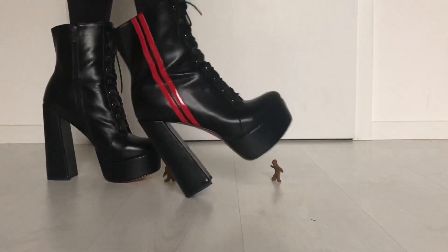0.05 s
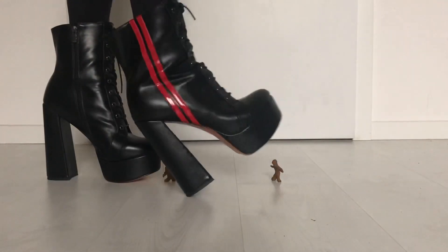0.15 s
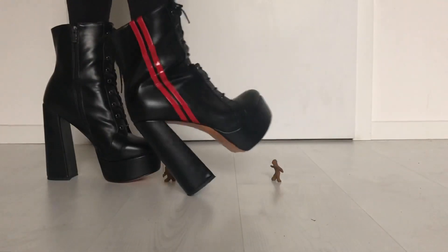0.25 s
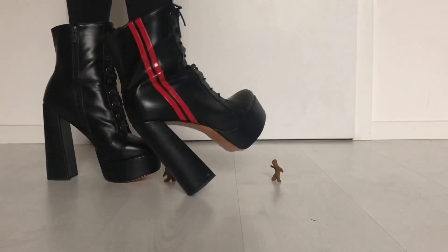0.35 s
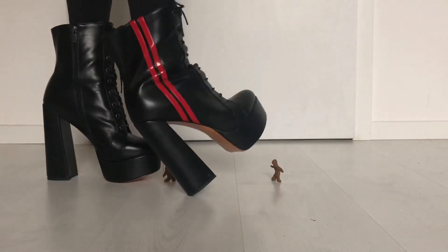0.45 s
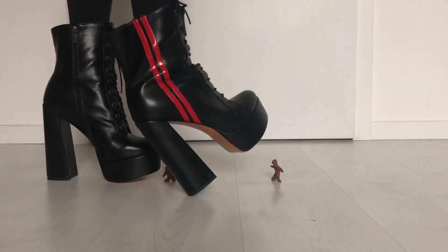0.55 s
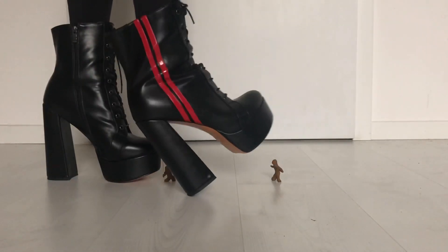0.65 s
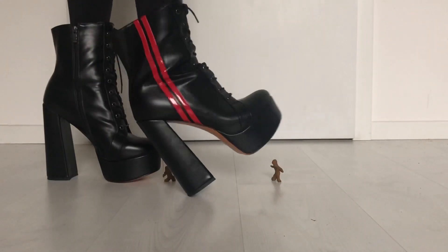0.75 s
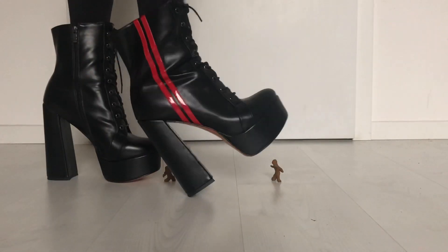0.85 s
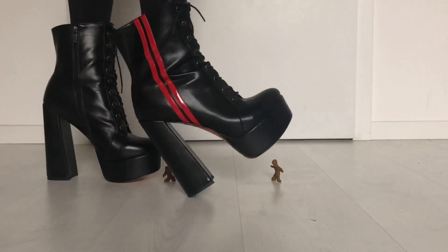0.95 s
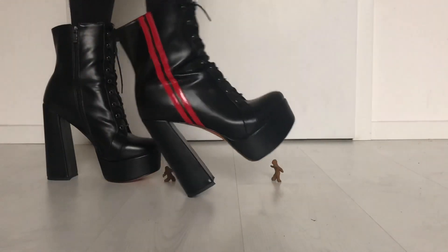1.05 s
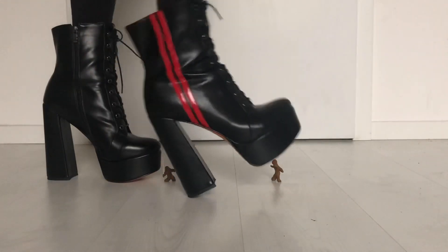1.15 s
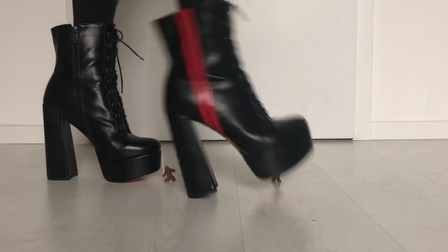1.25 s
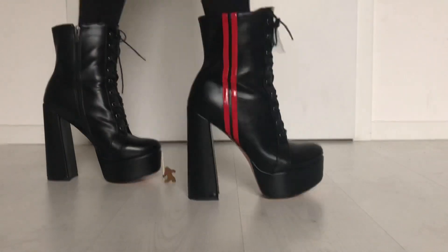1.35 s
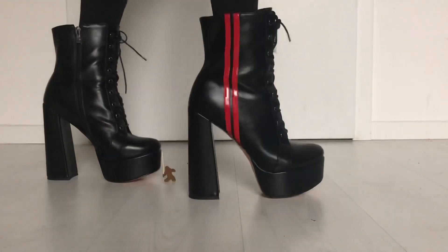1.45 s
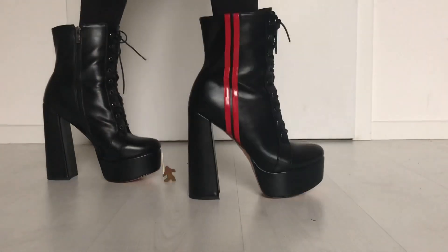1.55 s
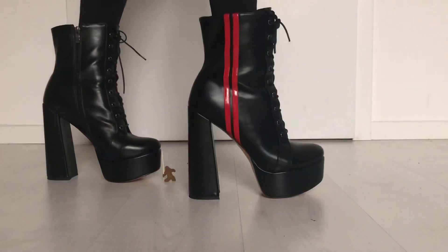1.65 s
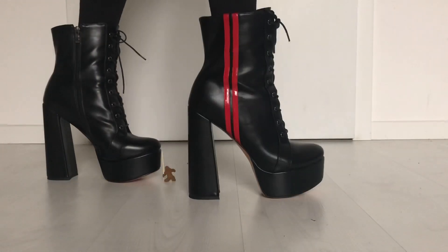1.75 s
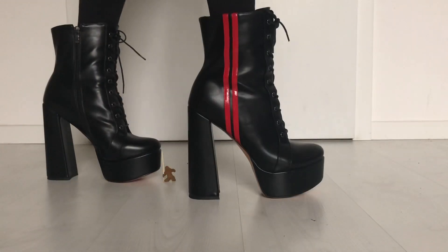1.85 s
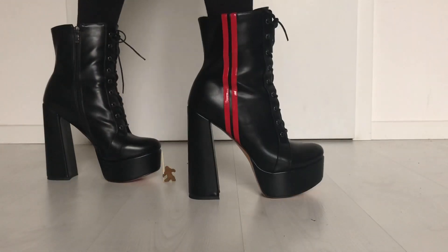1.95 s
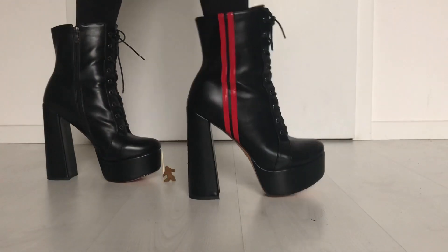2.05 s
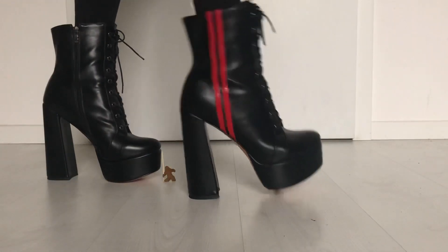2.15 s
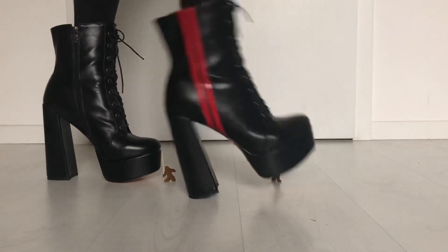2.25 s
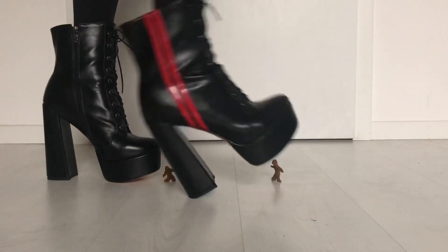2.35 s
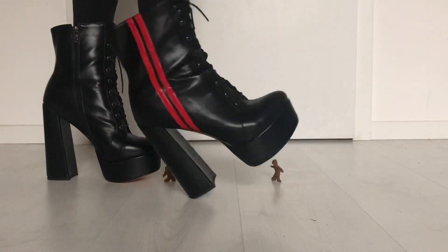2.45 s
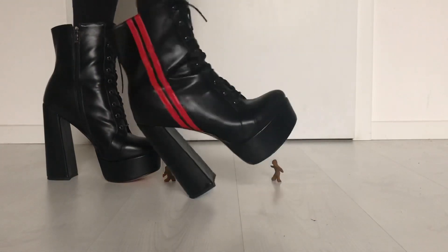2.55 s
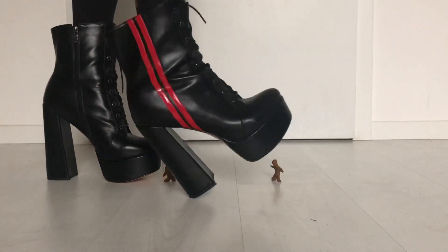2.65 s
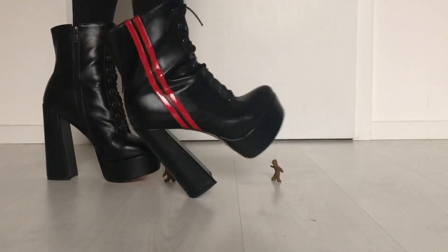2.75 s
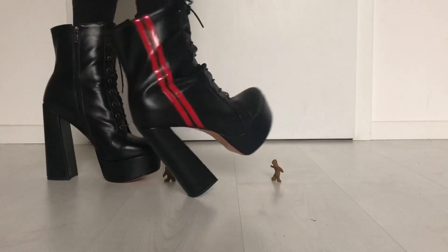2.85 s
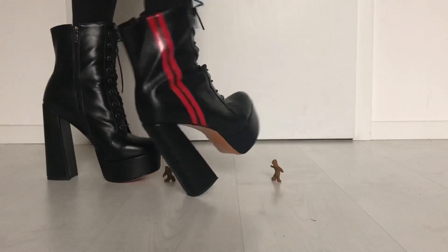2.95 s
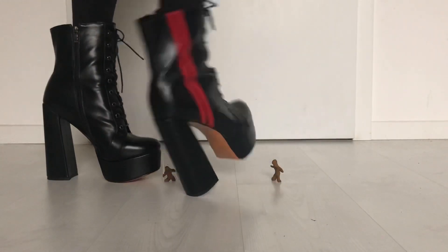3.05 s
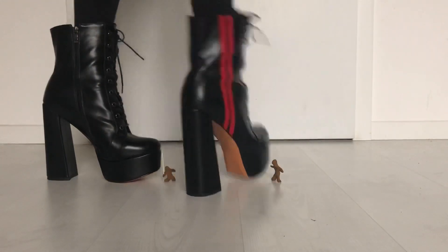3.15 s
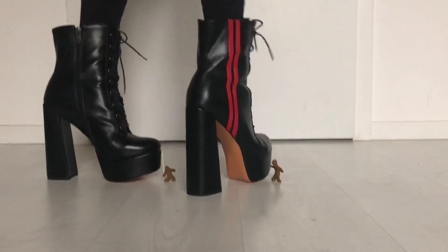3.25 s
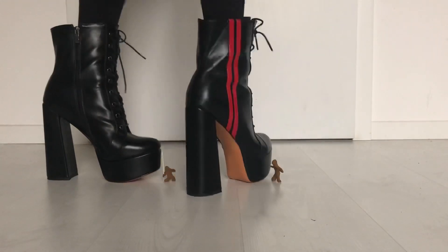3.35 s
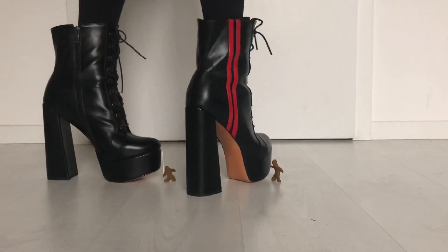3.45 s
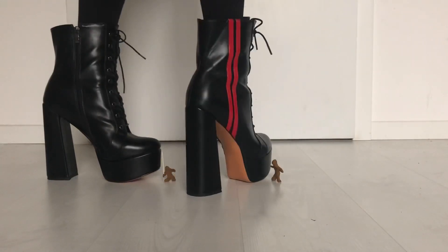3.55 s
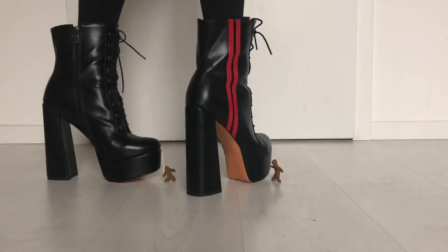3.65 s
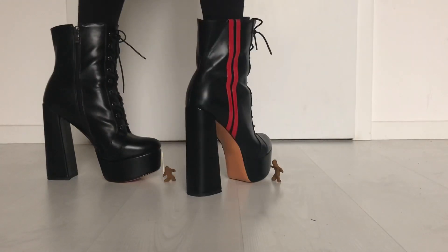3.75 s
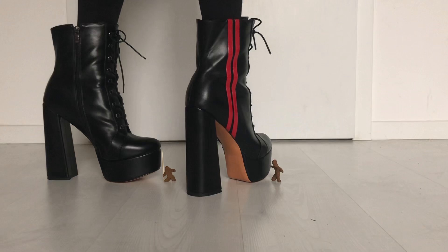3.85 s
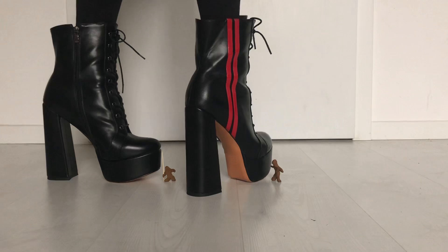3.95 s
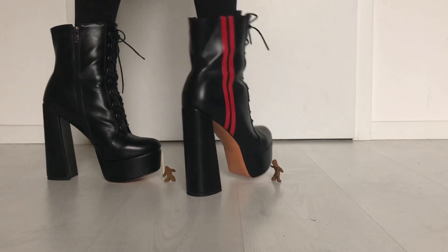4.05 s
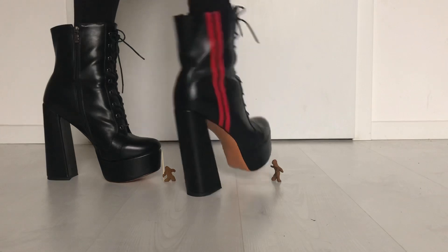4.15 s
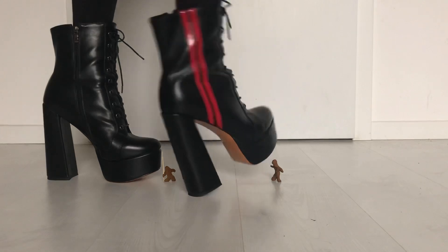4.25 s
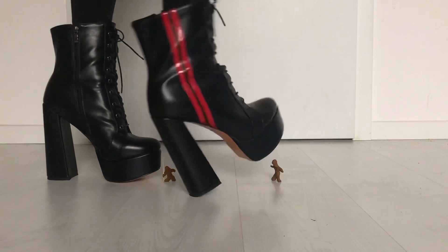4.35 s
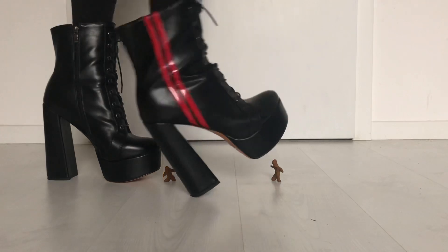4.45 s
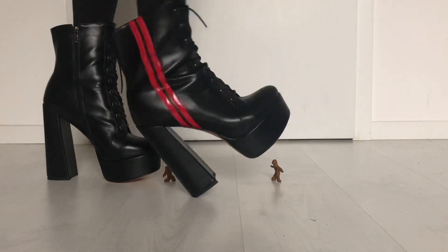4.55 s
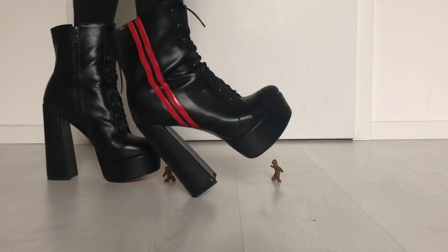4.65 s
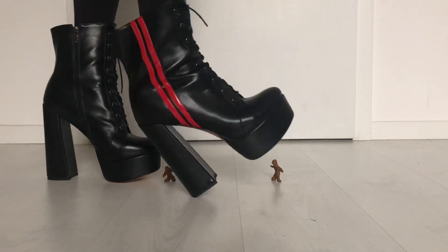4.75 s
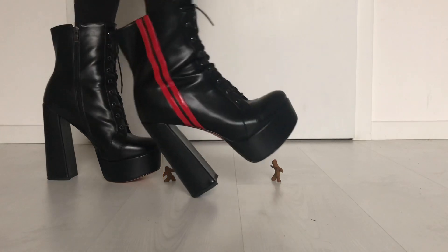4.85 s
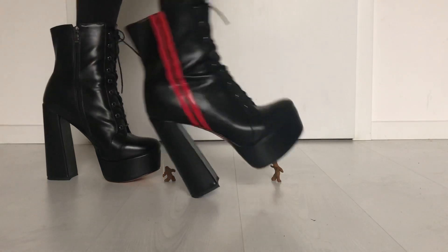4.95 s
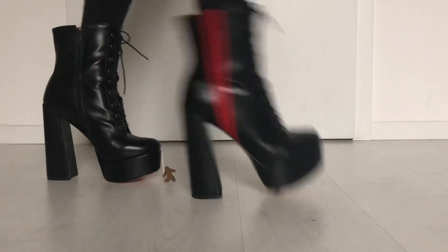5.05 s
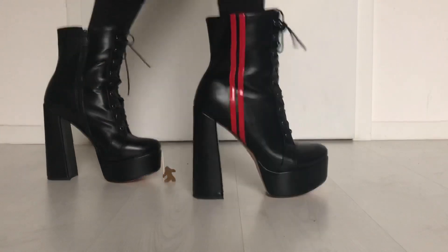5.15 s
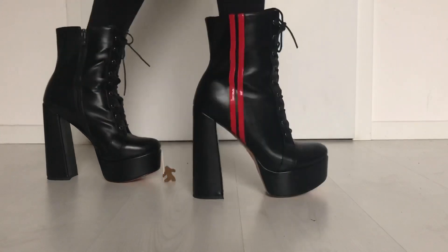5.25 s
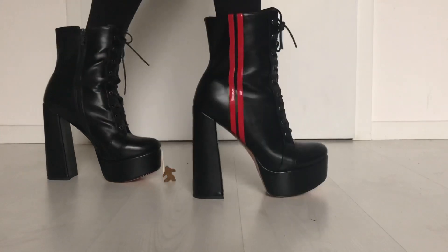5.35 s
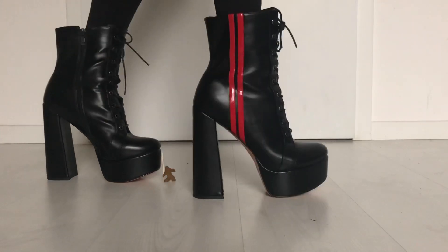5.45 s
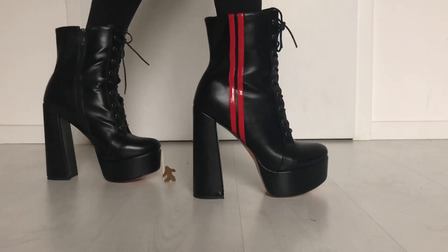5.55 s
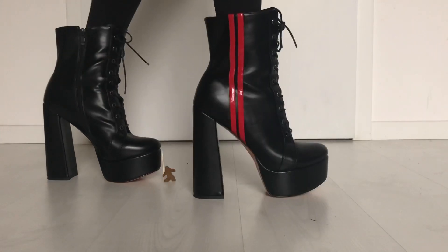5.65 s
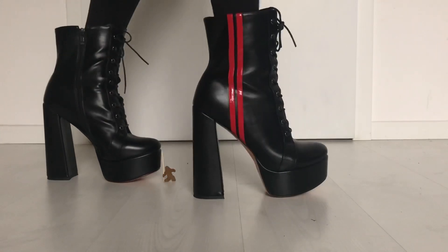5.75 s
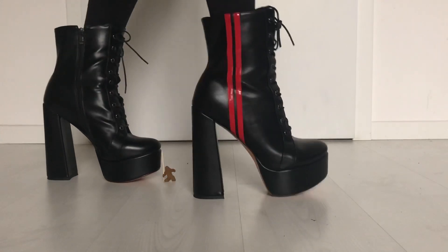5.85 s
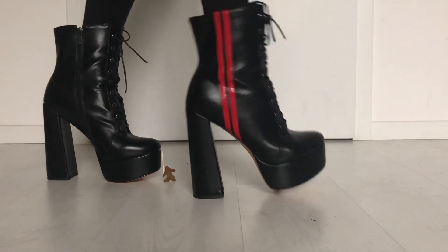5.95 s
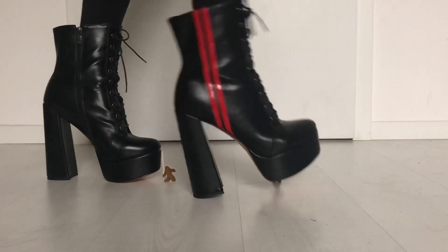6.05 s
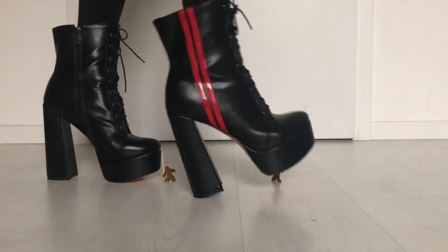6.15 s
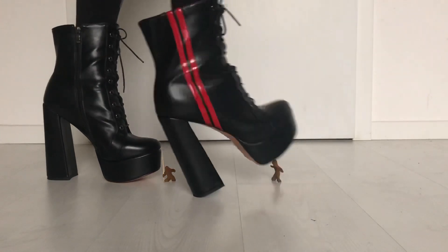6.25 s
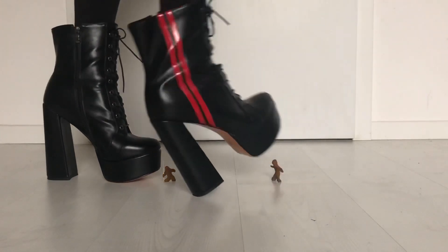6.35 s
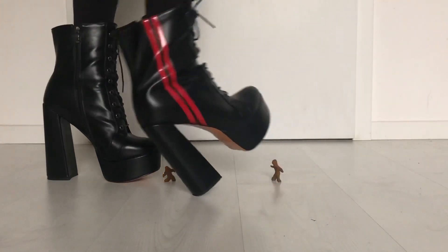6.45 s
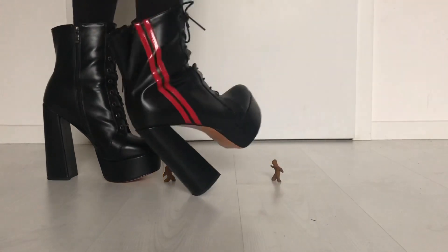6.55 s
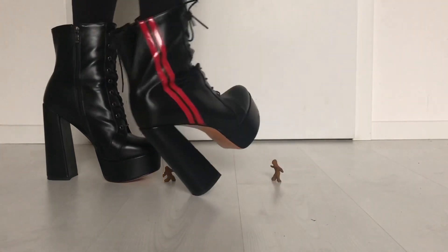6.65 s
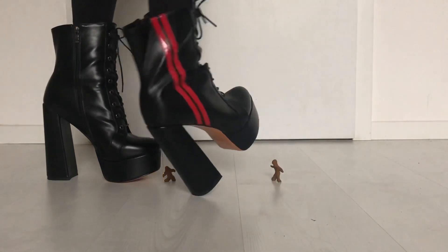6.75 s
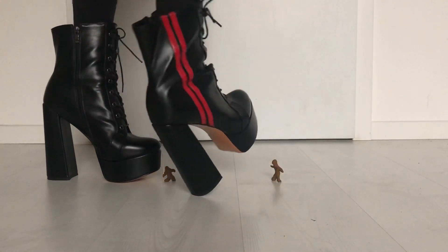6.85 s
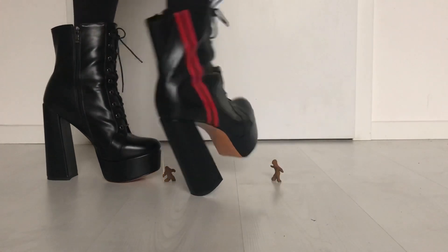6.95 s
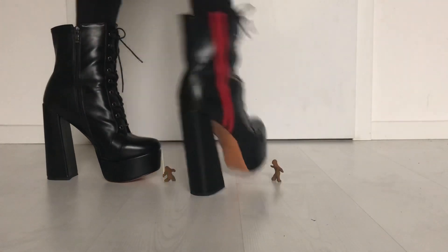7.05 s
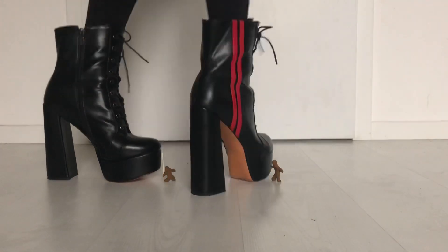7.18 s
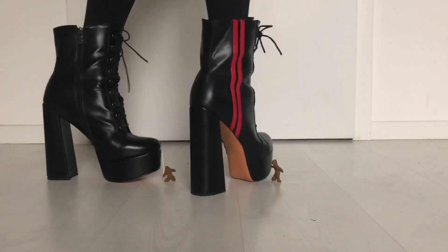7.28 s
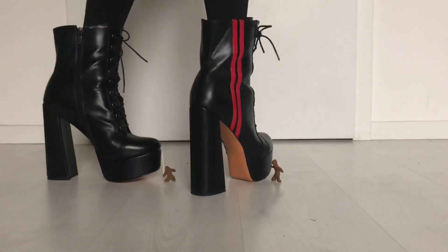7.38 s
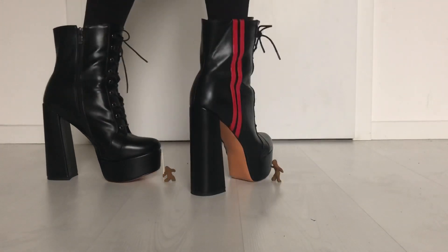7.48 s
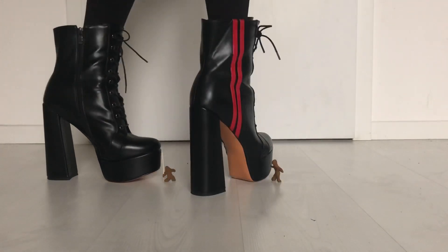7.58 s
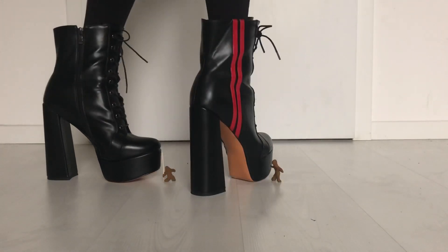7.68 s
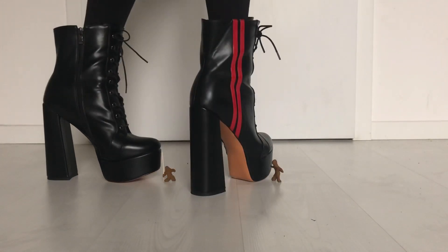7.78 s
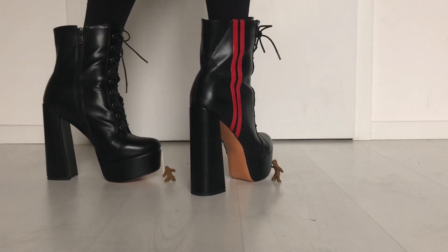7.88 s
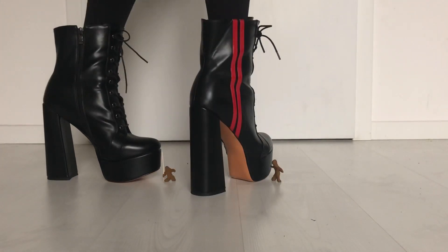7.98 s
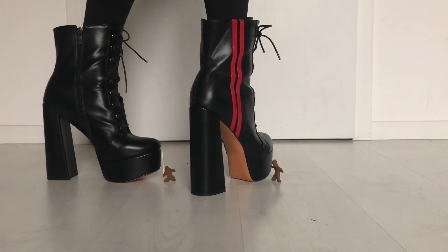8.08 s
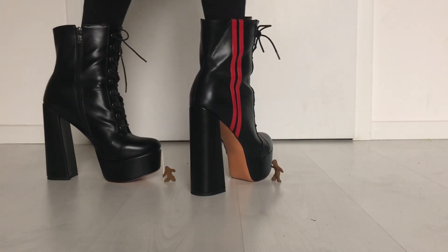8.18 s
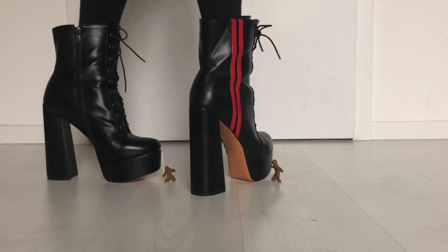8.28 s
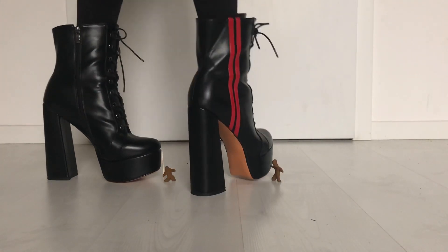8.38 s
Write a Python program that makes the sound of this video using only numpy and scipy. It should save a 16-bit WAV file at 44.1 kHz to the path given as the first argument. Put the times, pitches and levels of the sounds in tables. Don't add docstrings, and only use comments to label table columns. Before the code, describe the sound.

A chunky heeled boot stamps on floating boards, heard from a low microphone nearby. Four evenly spaced blows snap and knock hollowly, the first softest in its click, the second duller, the third clicking hardest, the last loudest and bright. Bare walls answer briefly. Faint leather swishes, creaks, lace ticks and small heel taps lie between, over low hiss and distant rumble.

```python
import sys
import numpy as np
from scipy import signal
from scipy.fft import rfft, irfft, next_fast_len
from scipy.io import wavfile
from scipy.ndimage import uniform_filter1d, map_coordinates

SR = 44100
rng = np.random.default_rng(int(sys.argv[2]) if len(sys.argv) > 2 else 0)


def wav_out(sig):
    wavfile.write(sys.argv[1], SR, np.round(np.clip(np.atleast_2d(sig).T, -1, 1) * 32767).astype(np.int16))


def elevation(decibels):
    levels = np.asarray(decibels, float)
    return 10 ** (levels / 20)


N = 371322

# start_s, click_db, knock_db, thump_db, extra click treble_db, stance of the boot
STAMPS = [
    (1.2926, -24.5, -15, -17.5, -1.5, "across"),
    (3.1424, -19.5, -10, -13.5, -10, "turned"),
    (5.0415, -16.5, -11.5, -14.5, 0, "across"),
    (7.0581, -17.5, -6, -10.5, 6, "turned"),
]
STANCE = {"across": (.6, 1600, 400, 2.5, 2.2), "turned": (2.0, 1290, 325, 1.6, .72)}


def unit(x):
    return x / np.sqrt(np.mean(x ** 2) + 1e-20)


def along(points, hz):
    f, v = np.transpose(points)
    return np.interp(np.log(hz + 1), np.log(f + 1), v)


def wobble(rate):
    knots = rng.standard_normal(int(N * rate / SR) + 4)
    return map_coordinates(knots, [np.arange(N) * rate / SR])


def coloured(x, spectrum):
    size = next_fast_len(len(x) + 8192)
    hz = np.fft.rfftfreq(size, 1 / SR)
    lowest, highest = spectrum[0][0] / 2, spectrum[-1][0] * 1.3
    closed = [(lowest, -120), *spectrum, (highest, -120)]
    return irfft(rfft(x, size) * elevation(along(closed, hz)), size)[:len(x)]


def add(track, s, sound):
    part = track[round(s * SR):][:len(sound)]
    part += sound[:len(part)]


def stamps():
    # pitch_hz, level_db, t60_s
    edge_modes = [(1750, -16, .004), (3510, -2, 0.0036), (4040, -1, 0.0036), (4580, -4, 0.0029),
                  (6070, -17, 0.0024), (7800, -10.5, 0.0026), (10500, -20, .002), (13700, -24.5, .002)]
    # pitch_hz, level_db
    sole_dip = [(900, 0), (1900, 0), (2450, -9), (3000, 0), (16000, 0)]
    # pitch_hz, level_db, t60_s
    boom_modes = [(84, -5, .3), (126, -5.5, 0.34), (158, -4, 0.46), (190, 0, 0.18), (208.6, 3.5, .22),
                  (274, 0, 0.31), (342.5, -5, 0.33), (395.3, -4.5, 0.36), (434, -5.5, 0.16),
                  (530, -10, .34), (690, -14.5, 0.27), (830, -17, .33)]
    sent_colour = {"across": [(60, 0), (400, 1.5), (570, -5.5), (1020, 5), (1350, -3), (4000, 0)],
                   "turned": [(60, 0), (400, 0), (570, -2.5), (900, .5), (1250, -2), (1700, 3), (4000, 0)]}
    # pitch_hz, level_db
    clack_colour = [(700, -30), (1500, -8), (2400, -7.5), (3600, 1), (5000, -2.5), (8000, -16),
                    (12000, -20), (15500, -21)]
    near, sent, blows = np.zeros(N), np.zeros(N), np.zeros(N)
    t = np.arange(SR // 2) / SR
    for s, click_db, knock_db, thump_db, treble_db, stance in STAMPS:
        contact_s = .0002 + .0007 * STANCE[stance][0]
        scrape = elevation(-30 * t[:120] / contact_s) * rng.standard_normal(120)
        edge = [(hz, db + treble_db * (hz > 5500), t60) for hz, db, t60 in edge_modes]
        ringing = ring(edge, t[:400], 1.3, attack=0.00043)
        click = coloured(np.convolve(ringing, scrape), sole_dip)
        click = click / np.abs(click).max()
        hollow = elevation(knock_db) * knock(t, *STANCE[stance])
        bounce = elevation(thump_db) * thump(t)
        add(near, s, elevation(click_db) * click)
        add(near, s, hollow + bounce)
        add(near, s + .0283, elevation(click_db - 19.5) * click)
        add(near, s + .0269, elevation(-15) * coloured(hollow, [(60, 0), (450, -1.5), (900, -11)]))
        add(near, s + .016, elevation(thump_db - 19.5) * ring(boom_modes, t, 2.5, attack=.006, drift=7.5))
        add(sent, s + .004, coloured(hollow, sent_colour[stance]))
        add(sent, s + .012, elevation(-9.5) * bounce)
        blows[round(s * SR)] = elevation(click_db + 17.5)
    return near, sent + coloured(blows, clack_colour)


def ring(modes, t, spread_db, attack, drift=0):
    hz, db, t60 = np.transpose(modes)[:, :, None]
    steps = rng.standard_normal((len(modes), len(t) // 200 + 1))
    wander = np.cumsum(steps, axis=1).repeat(200, axis=1)
    wander = drift * np.sqrt(200 / SR) * wander[:, :len(t)]
    wander = uniform_filter1d(wander, size=400, axis=1)
    level = elevation(db + spread_db * rng.standard_normal(hz.shape) - 60 * t / t60)
    tones = level * np.sin(2 * np.pi * hz * t + wander)
    return (1 - np.exp(-t / attack)) * np.sum(tones, axis=0)


def knock(t, delay_ms, start_hz, end_hz, swell_ms, abrupt):
    t = np.maximum(t - delay_ms / 1000, 0)
    glide_s = .0013
    turns = end_hz * t + (start_hz - end_hz) * glide_s * (1 - np.exp(-t / glide_s)) - .53
    u = t * 1000 / swell_ms
    onset = 1 - np.exp(-(t * 2200 / delay_ms) ** 2)
    swell = u * np.exp((1 - u ** abrupt) / abrupt)
    return onset * swell * np.sin(2 * np.pi * turns)


def thump(t):
    rise = 1 - np.exp(-(t / .0083) ** 4)
    stilled = 1 + np.exp(np.clip((t - .0201) / .0011, -50, 50))
    phase = 2 * np.pi * (142 * (t - .0103) + 58 * np.maximum(t - .0165, 0))
    return rise / stilled * (np.cos(phase) + .12 * np.cos(2 * phase))


def taps():
    # start_s, peak_db, centre_hz, knock_db, thump_db
    heels = [(0.764, -49, 1200, -3.5, -12), (0.7874, -53.5, 2200, -7, -19), (1.9582, -48, 1860, -8, -3.5),
             (2.2845, -48.5, 1630, -17, -23), (2.6738, -49.5, 1900, -11, -17),
             (3.3955, -56, 1340, -12, -9.5), (3.8921, -54.5, 3000, -13, -4), (3.903, -44.5, 1900, -13, -12),
             (3.939, -49, 1100, -4, -10), (4.2467, -48.5, 1673, -14, -18.5), (5.3415, -49, 2300, -14, -13),
             (5.7844, -61, 1900, -7, 5), (6.1779, -47, 1900, -17, -18), (6.2766, -55.5, 2414, -6.5, -4.5),
             (8.2427, -50.5, 2980, -9, -6), (8.2725, -51.5, 2600, -6.5, -8)]
    # start_s, peak_db, centre_hz
    creaks = [(0.2703, -61.5, 1890), (0.8445, -59, 5740), (1.5628, -57, 1300), (2.0707, -61, 7040),
              (2.364, -51.5, 1220), (2.4688, -56.5, 1630), (2.5591, -59.5, 1320), (2.6424, -62, 1800),
              (2.6994, -57, 1350), (2.878, -58, 1250), (1.058, -60, 4000), (6.386, -60, 3500),
              (2.9272, -62, 1780), (3.3293, -53, 1820), (3.7848, -60.5, 2520), (4.7082, -52, 2220),
              (4.81, -53, 2550), (5.6994, -57, 1198), (6.2094, -50, 1570), (6.6538, -51, 1310),
              (6.7376, -53, 7500), (7.3647, -61.5, 3240), (8.0157, -55, 2360), (8.1254, -61, 1220),
              (8.1824, -58.5, 1312)]
    # start_s,
    # peak_db, centre_hz, sharpness
    ticks = [(1.344, -41, 10500, 0.87), (1.392, -56, 11300, 2.8), (1.499, -58.5, 9500, 1),
             (1.505, -54.5, 7300, 0.75), (3.124, -52.5, 2300, 1.5), (3.116, -54, 2200, 2.3),
             (6.89, -57, 1192, 1.5), (3.221, -42, 8450, 0.99), (3.258, -53, 11550, 2.5),
             (5.088, -48, 12500, 1.2), (5.092, -34, 5600, 0.38), (5.13, -49, 10500, 1.5),
             (5.219, -46.5, 11430, 2), (7.105, -42, 13160, 1.2), (7.141, -43, 8200, 0.99),
             (7.2, -58, 11500, 2.9), (1.563, -62, 3700, 2.06), (2.072, -67, 7900, 2.5),
             (2.367, -53, 7200, 3.7), (2.366, -60, 4400, 3.7), (4.247, -49, 6800, 1.4),
             (5.343, -57, 8800, 1.27), (6.277, -60, 6800, 3.7), (6.738, -55, 7440, 2.6),
             (2.927, -57.5, 8600, 1.5)]
    # pitch_hz, level_db
    dull = [(300, 2.5), (3000, 2.5), (7000, -3), (16000, -6)]
    out, t = np.zeros(N), np.arange(2000) / SR
    creak_knock_db, creak_thump_db = -7, -14
    contacts = [*heels, *[(*row, creak_knock_db, creak_thump_db) for row in creaks]]
    for s, db, hz, knock_db, thump_db in contacts:
        board = elevation(knock_db) * knock(t, *STANCE["across"]) + elevation(thump_db) * thump(t)
        soft_crack = coloured(crack(hz, sharp=1.05, t60=.008), dull)
        add(out, s, elevation(db) * (soft_crack + board))
    for s, db, hz, sharp in ticks:
        add(out, s, elevation(db) * crack(hz, sharp, t60=0.023))
    return out


def crack(hz, sharp, t60):
    burst = elevation(-60 * np.arange(2000) / SR / t60) * rng.standard_normal(2000)
    shape = [(500, -14 * sharp), (hz / 1.3, -7 * sharp), (hz, 0), (hz * 1.2, -7 * sharp),
             (max(16000, hz * 1.3), -12 * sharp - 4)]
    out = coloured(burst, shape)
    return out / np.abs(out).max()


def rustle():
    # peak_s, body_db, fizz_db, swell_s, fade_s (swell and fade over 20 dB)
    moves = [(0.01, -75, -80, .1, .5), (0.5, -81, -89, .02, .4), (0.766, -68.5, -76, .015, .09),
             (1.96, -66, -76, .02, .09), (2.29, -66.5, -67, .15, .3), (2.682, -73, -73, .06, .15),
             (3.902, -63, -76, .03, .07), (3.945, -66, -78, .01, .12), (4.26, -72.5, -76, .35, .6),
             (4.712, -73, -77, .02, .04), (5.7, -75.5, -80.5, .03, 1), (6.19, -71.5, -72, .13, .6),
             (6.654, -67.5, -70, .01, .05), (6.746, -78, -78, .07, .06), (7.496, -80, -81, .1, .7),
             (8.022, -72.5, -84, .05, .06), (8.25, -69.5, -70.5, .15, .15), (2.09, -74, -81, .08, .15),
             (2.88, -73, -78, .06, .3), (6.95, -76, -72, .1, .1)]
    # peak s before it, body_db, fizz_db, swell_s, fade_s
    swing = (.033, -68.5, -68.5, .28, .42)
    # pitch_hz, level_db per Hz
    leather = [(250, -17), (700, 3), (1500, 1.5), (3500, -6), (6000, -14), (9000, -40.5)]
    # pitch_hz, level_db per Hz
    fizz_colour = [(2500, -25.5), (5000, -2.5), (9000, -4), (15500, -5)]
    # pitch_hz, level_db per Hz
    grit_colour = [(700, -14), (1800, 0), (4000, -1), (7000, -10), (14000, -16)]
    grit_per_s, grit_db = 600, -5.5
    t = np.arange(0, N, 64) / SR
    swings = [(stamp[0] - swing[0], *swing[1:]) for stamp in STAMPS]
    s, body_db, fizz_db, swell, fade = np.transpose([*moves, *swings])[:, :, None]
    shape_db = -20 * np.where(t < s, (s - t) / swell, (t - s) / fade)

    def level(db):
        total = np.sqrt(np.sum(elevation(db + shape_db) ** 2, axis=0))
        return np.interp(np.arange(N) / SR, t, total)

    slips = elevation(2 * wobble(25) + 3 * wobble(400))
    body = unit(coloured(slips * rng.standard_normal(N), leather))
    fizz = unit(coloured(slips * rng.standard_normal(N), fizz_colour))
    specks = (rng.random(N) < grit_per_s / SR) * rng.standard_normal(N)
    fading = signal.lfilter([1], [1, -elevation(-60 / SR / .008)], np.abs(specks))
    grit = unit(coloured(fading * rng.standard_normal(N), grit_colour))
    return level(body_db + grit_db) * grit + level(body_db + 1.5) * body + level(fizz_db - 1.5) * fizz


def room(x):
    # pitch_hz, t60_s
    walls = [(60, 0.12), (160, 0.4), (420, 0.26), (1100, 0.41), (2900, .38), (7700, 0.52), (15000, 0.1)]
    # pitch_hz, level_db
    wall_gain = [(50, -20), (85, -2.5), (150, -12), (400, -7.5), (800, -10), (1150, -8), (1500, -6),
                 (2000, 0), (4000, -14), (8000, -9.5), (15000, -4.5)]
    hz, t, z = signal.stft(rng.standard_normal(SR * 3 // 4), SR, nperseg=256)
    fading = elevation(-60 * t / along(walls, hz)[:, None])
    tail = signal.istft(z * fading, SR, nperseg=256)[1]
    tail = np.pad(tail / np.linalg.norm(tail), (round(0.0032 * SR), 0))
    return signal.fftconvolve(x, coloured(tail, wall_gain))[:N]


def background():
    # pitch_hz, level_db per Hz
    hush = [(12, -52), (20, -26.5), (39, -2.5), (60, 3), (93, -15), (123, -12), (204, -12.5), (248, -13),
            (337, -14.5), (1370, -26.5), (1530, -29), (7110, -30.5), (16000, -37.5)]
    # time_s, level_db
    rumble = [(0, -69), (.39, -73), (.77, -68.5), (1.6, -73.5), (2.1, -67), (2.6, -72), (3.0, -67.5),
              (3.5, -72), (4.2, -71.5), (4.9, -70), (5.87, -68), (6.4, -69.5), (7.0, -68), (7.7, -73.5),
              (8.15, -69), (8.42, -70)]
    # pitch_hz, level_db per Hz
    traffic = [(25, -21), (55, -1), (130, -5.5), (250, -7.5), (600, -19.5), (1200, -43)]
    hiss = elevation(-69) * unit(coloured(rng.standard_normal(N), hush))
    lumps = elevation(1.5 * wobble(3) + 2 * wobble(12))
    s, db = np.transpose(rumble)
    rumble_db = np.interp(np.arange(N) / SR, s, db) - 2.0
    return hiss + elevation(rumble_db) * unit(lumps * coloured(rng.standard_normal(N), traffic))


def scene():
    near, sent = stamps()
    small = taps()
    answer = room(sent + elevation(-2.5) * small)
    return (near + small + answer + rustle() + background())[None]


def roll_off(x):
    return signal.sosfilt(signal.butter(12, 15830, fs=SR, output="sos"), x)


def record(dry):
    low_cut = signal.butter(2, 40, "highpass", fs=SR, output="sos")
    mix = signal.sosfilt(low_cut, dry)
    return roll_off(mix)


dry = scene()
out = record(dry)
wav_out(out)
```